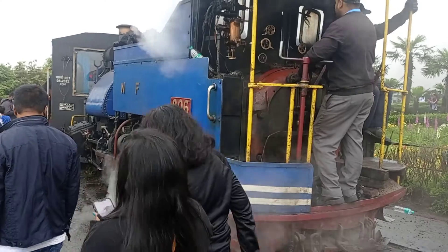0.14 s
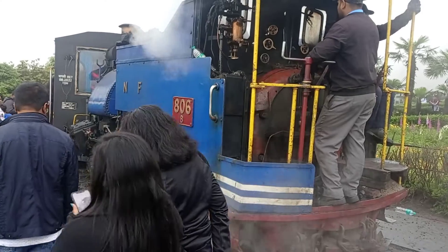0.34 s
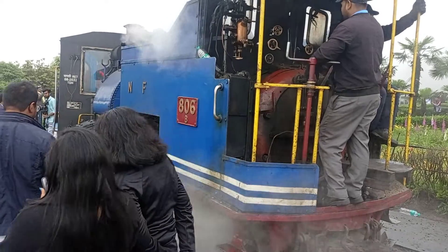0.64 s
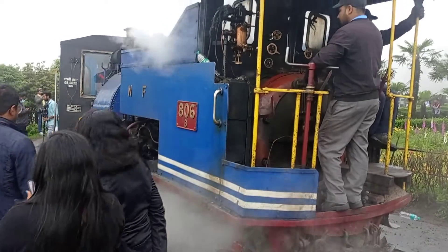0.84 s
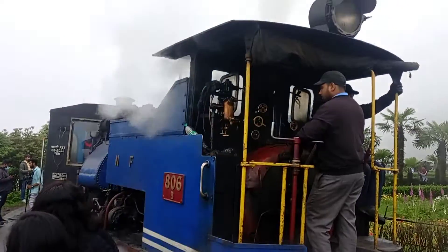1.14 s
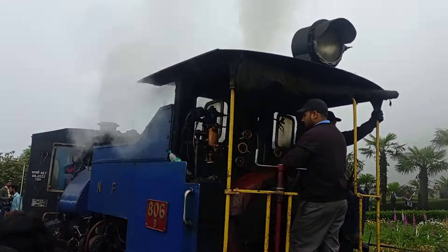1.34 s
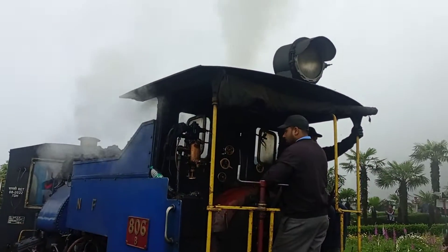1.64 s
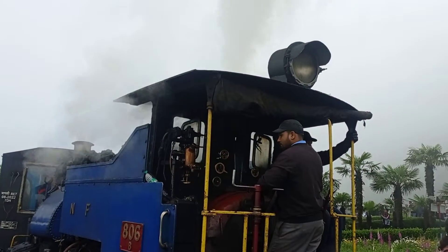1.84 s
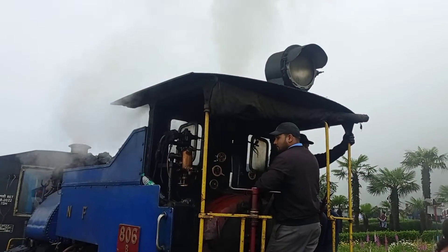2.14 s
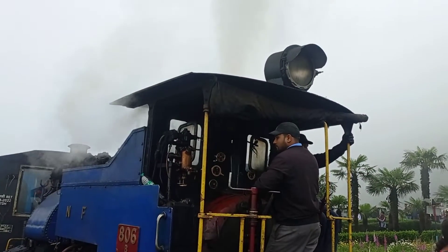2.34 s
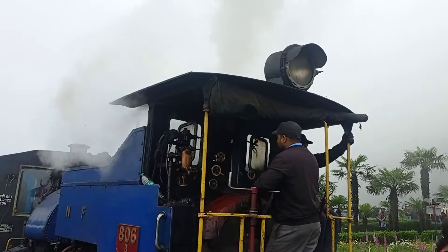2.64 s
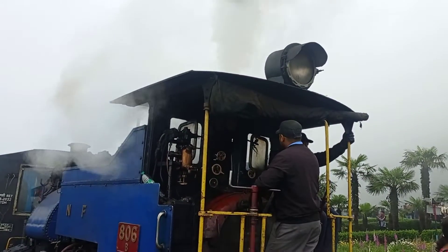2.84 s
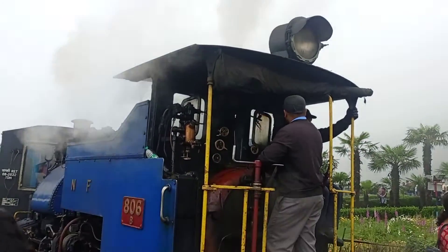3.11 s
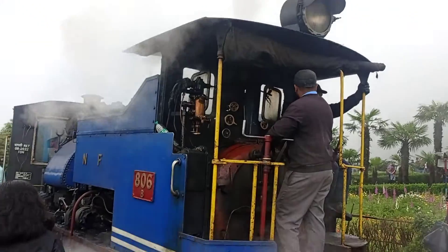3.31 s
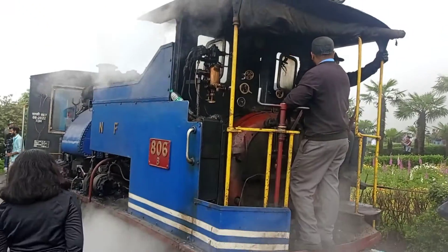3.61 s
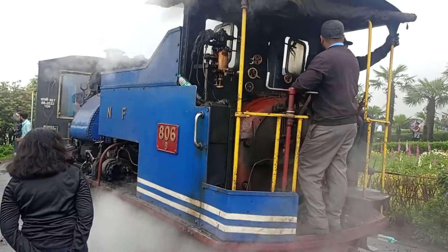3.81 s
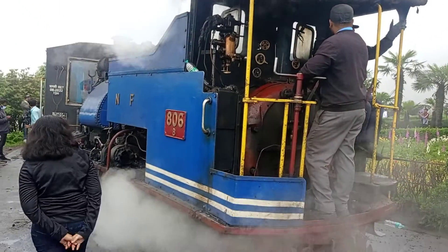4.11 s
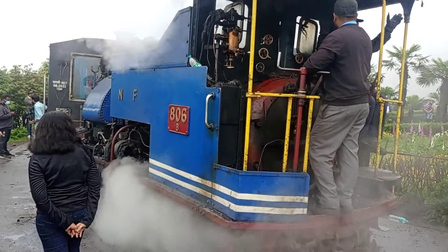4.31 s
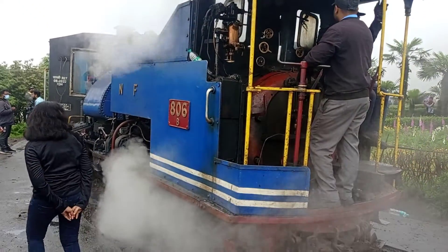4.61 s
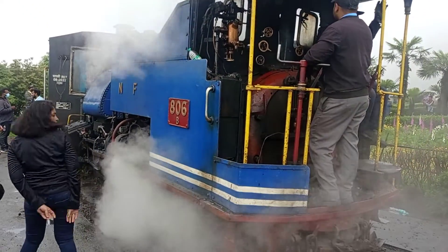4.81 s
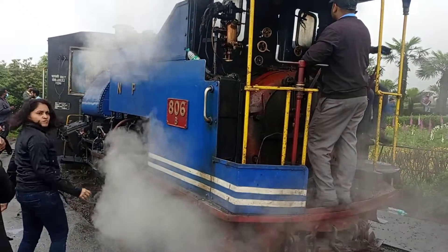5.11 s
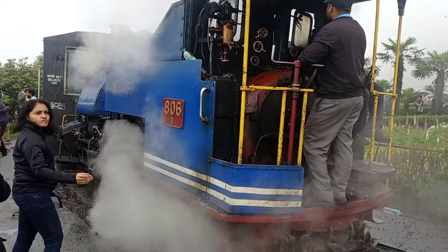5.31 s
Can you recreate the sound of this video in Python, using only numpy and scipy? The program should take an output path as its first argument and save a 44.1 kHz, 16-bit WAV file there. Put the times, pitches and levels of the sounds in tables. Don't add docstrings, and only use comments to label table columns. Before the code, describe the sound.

Outdoors, a few metres from a small steam engine, a handheld microphone catches a brief bump, then one unbroken shrill whistle. It begins hollow and flickering, blooms loud within the first second or so, and stays steady with trembling, shifting overtones. Breathy steam and leaking hiss run underneath, low rumble growing with the loud note and dropping later. It cuts off while still blowing.

```python
import sys
import numpy as np
from scipy import signal
from scipy.fft import rfft, irfft
from scipy.io import wavfile
from scipy.ndimage import uniform_filter1d

SR = 44100
rng = np.random.default_rng(int(sys.argv[2]) if len(sys.argv) > 2 else 0)


def voltage_ratio(level):
    return 10 ** (np.asarray(level, float) / 20)


def unload_wav(signal):
    wavfile.write(
        sys.argv[1],
        SR,
        np.round(np.clip(np.atleast_2d(signal).T, -1, 1) * 32767).astype(np.int16),
    )


N = 240464

DOWN_S, DOWN_TAKES_S = 3.285, 0.51


def whistle(partial_db):
    # (time [s], pitch [Hz])
    pitch_track = [(0.0, 1069.1), (0.62, 1070.5), (0.93, 1071.7), (1.25, 1071.1), (1.71, 1072.7),
                   (1.85, 1072.6), (2.17, 1074.2), (2.4, 1076.1), (2.63, 1074.9), (3.0, 1075.9),
                   (3.3, 1075.7), (3.45, 1076.7), (3.89, 1077.6), (4.35, 1077.6), (4.58, 1075.5),
                   (4.81, 1077.1), (5.28, 1076.8), (5.45, 1077.8)]
    # (multiple of the pitch [1], rms level [dB], loudest at [s], fall [dB/s])
    high_beams = [(8, -67, 4.6, 2.2), (9, -74, 2.0, 4.0), (10, -70, 2.3, 4.0)]
    t = np.arange(N) / SR
    pitch_hz = np.interp(t, *np.transpose(pitch_track))
    tremble_hz = 0.6 * walk(40) + 1.3 * walk(90)
    phase = 2 * np.pi * np.cumsum(pitch_hz + tremble_hz) / SR
    first_db = partial_db[0]
    tone = voltage_ratio(first_db - 0.74) * np.sin(phase)

    open_db = np.clip(first_db + 15.5, 0, 9)
    shut_db = np.clip(-18 - first_db, 0, 14)
    scatter = voltage_ratio(-42 - 1.5 * open_db - 0.3 * shut_db) * voltage_ratio(1.2 * walk(8))
    sharp = phase + 2 * np.pi * 22 * t
    tone = tone + scatter * (walk(90) * np.sin(sharp) + walk(90) * np.cos(sharp))

    overtones = list(zip(range(2, 8), partial_db[1:]))
    for multiple, level_db, loudest_s, fall in high_beams:
        overtones.append((multiple, level_db - fall * abs(t - loudest_s) + walk(3)))
    for multiple, level_db in overtones:
        flutter_db = 0.4 * walk(30) + min(0.4 * multiple, 1.6) * walk(80)
        slide = walk(1.2) + 0.15 * walk(50)
        tone = tone + voltage_ratio(level_db + flutter_db) * np.sin(round(multiple) * phase + slide)
    return np.sqrt(2) * tone


def partial_levels():
    # (rms level [dB], change after the tilt down [dB])
    overtone_levels = [(-35.5, -7), (-33.5, -0.1), (-49.5, 6.5), (-53.5, 2), (-50, -6), (-65.5, 5)]
    # (time [s], half width [s], change [dB])
    sway_1 = [(.03, .015, 8), (.095, .018, 11.5), (.185, .045, 11.5), (.37, .04, -10), (.44, .02, -16),
              (.52, .035, 5.5), (.71, .06, 9), (.84, 0.054, 5), (3.85, .05, -0.1), (4.12, .07, 1),
              (4.25, .04, -0.2), (4.45, .07, 0.9), (4.64, .09, -2.5), (4.9, .1, .5), (5.14, .05, -1)]
    sway_2 = [(.2, 0.39, -1.5), (.72, 0.21, 4), (1.09, 0.085, -11), (1.9, 0.16, 2), (2.3, .05, -3),
              (2.44, 0.034, 3.5), (3.3, 0.1, -2.5), (3.8, .15, -5), (4.05, .08, 1), (4.38, 0.082, -11),
              (4.68, .11, 7), (4.92, .06, -5), (5.18, .025, -6)]
    sway_3 = [(.15, 0.28, -4), (.9, 0.015, 4), (1.06, 0.04, -14), (1.13, 0.025, 5), (1.28, .08, -8),
              (1.85, .12, 3), (2.08, 0.032, -5), (2.26, 0.13, 6.5), (2.41, 0.033, -6), (2.8, 0.42, -9),
              (3.17, 0.081, -11.5), (3.355, 0.03, -16), (3.5, .04, 4), (3.6, 0.024, -7), (3.9, 0.045, -4.5),
              (4.35, 0.14, 3.5), (4.68, 0.059, 4), (4.83, 0.017, -6), (5.3, .04, -3.5)]
    sway_4 = [(.55, 0.1, 7.5), (.87, 0.17, 13.5), (1.12, .08, 6), (1.58, .08, 3.5), (2.42, 0.14, 9.5),
              (3.12, 0.12, 7), (3.4, 0.21, 9.5), (3.7, 0.13, -7.5), (4.45, 0.098, 3.5), (4.66, 0.056, -6),
              (5.0, 0.32, 4), (5.35, 0.035, -5)]
    sway_5 = [(.7, .45, 4), (2.4, .12, 4), (2.9, .2, 1.5), (3.24, .05, 6), (3.41, .09, 12),
              (3.67, .06, 3.5), (4.95, .25, 0.5), (5.35, .08, -8)]
    sway_6 = [(.3, .4, -5), (1.1, .15, -10), (2.2, .1, -3), (2.65, .08, 6), (2.8, .04, -4),
              (3.06, .12, 4.5), (4.15, .12, 5), (4.6, .2, -6), (5.35, .25, 8.5)]
    sway_7 = [(2.14, .06, 7), (2.45, 0.23, 9.5), (3.24, 0.074, 6), (3.5, 0.086, -9), (4.0, .15, 7),
              (4.55, .1, 5), (5.2, .3, 6)]
    up_s, swell_s = 0.86, 0.11
    dead_db, full_db, down_db = -40.5, -11.5, -3
    down = ramp(DOWN_S, DOWN_TAKES_S)
    hidden = np.exp(-np.clip(np.arange(N) / SR - up_s, 0, None) / swell_s)
    levels = [full_db + (dead_db - full_db) * hidden + down_db * down + swells(sway_1)]
    sways = (sway_2, sway_3, sway_4, sway_5, sway_6, sway_7)
    for (level_db, change_db), sway in zip(overtone_levels, sways):
        levels.append(level_db + change_db * down + swells(sway))
    return levels


def steam(breath_db, leak_db, jet_db):
    # (frequency [Hz], level per hertz [dB])
    breath_colour = [(100, -35.5), (200, -17.5), (450, -9), (800, -4.5), (1400, -2), (1800, 1), (2400, -2),
                     (3100, 2.5), (3750, -3), (4150, -4), (5000, -8.5), (7000, -14.5), (9000, -25.5),
                     (14500, -36)]
    leak_colour = [(200, -35), (340, -3.5), (450, -10.5), (600, -5.5), (800, 0), (1400, 3), (1750, -8),
                   (2300, 1), (3000, -6), (5500, 1.5), (7000, -7), (8500, -15), (11000, -26.5),
                   (14500, -31.5)]
    jet_colour = [(7000, -16.5), (9000, -6.5), (11000, -8), (13000, -17), (13950, -13.5), (14600, 0.5),
                  (15300, -1.5), (16500, -8.5)]
    # (centre [Hz], width [Hz], gain [dB])
    hollows = [(820, 28, 4.5), (1370, 100, 2.5), (1700, 300, -5), (2500, 78, -7), (2750, 130, 0),
               (3060, 80, -1), (3277, 46, 3.5), (3930, 160, -0.5), (4090, 360, 4), (6540, 170, 3),
               (8100, 320, -2.5)]
    breath = voltage_ratio(breath_db + 7.5) * hiss(breath_colour, 0.37, 0.48, 9)
    leak = voltage_ratio(1.495 * leak_db + 30) * hiss(leak_colour, 0, 0.5, 20)
    jet = voltage_ratio(1.218 * jet_db + 13.5) * hiss(jet_colour, 0, 0.96, 40)
    hz = np.fft.rfftfreq(N, 1 / SR)
    hollow_db = 0
    for centre_hz, width_hz, gain_db in hollows:
        hollow_db = hollow_db + gain_db * np.exp(-(2 * (hz - centre_hz) / width_hz) ** 2 / 2)
    return irfft(rfft(breath + leak) * voltage_ratio(hollow_db), N) + jet


def steam_levels():
    # (time [s], half width [s], change [dB])
    breath_puffs = [
        (.25, 0.17, -1),
        (2.0, .3, 0),
        (3.2, 0.36, -1.5),
        (4.3, 0.18, -0.2),
    ]
    leak_puffs = [
        (.68, .25, 0.92),
        (1.24, .12, -1.5),
        (3.6, .25, -1.5),
        (5.1, .3, 1.7),
    ]
    jet_puffs = [
        (.85, .2, 1.8),
        (2.5, .1, 1.2),
        (2.97, 0.14, 1.8),
        (3.96, .12, 1.8),
        (5.25, .25, 4),
    ]
    down = (DOWN_S, DOWN_TAKES_S)
    breath_db = turned(-46.5, 6.5, -0.5, (0.5, 0.72), down) + swells(breath_puffs)
    leak_db = turned(-45, -5, -0.5, (0.79, 0.48), down) + swells(leak_puffs)
    return breath_db, leak_db, -56 + swells(jet_puffs)


def rumble():
    # (frequency [Hz], level per hertz [dB])
    rumble_colour = [(25, -17.5), (55, -18), (100, -5.5), (200, 1), (400, -4), (700, -9)]
    low_db = turned(-73, 19.5, -9.5, (0.61, 0.91), (3.35, 0.5))
    return voltage_ratio(low_db + 2) * hiss(rumble_colour, 2.6, 1.2, 75)


def opening_thud():
    # (frequency [Hz], peak level [dB])
    thud_partials = [(85, -33), (390, -33), (620, -38.5), (900, -36), (1400, -33)]
    t = np.arange(N) / SR
    body = 0
    for hz, level_db in thud_partials:
        body = body + voltage_ratio(level_db + 1.5 * walk(157)) * np.sin(2 * np.pi * (hz * t + rng.random()))
    envelope = np.minimum(t / 0.002, (0.018 - t) / 0.003)
    return body * np.clip(envelope, 0, 1)


def hiss(colour, swell_db, flicker_db, rate):
    hz, db = np.transpose(colour)
    octave = np.log2(np.fft.rfftfreq(N, 1 / SR) + 1)
    colour_db = np.interp(octave, np.log2(hz), db, left=-90, right=-90)
    spectrum = rfft(rng.standard_normal(N)) * voltage_ratio(colour_db)
    common_db = swell_db * walk(rate / 4)
    out = 0
    for centre in np.arange(9, 30) / 2:
        band = irfft(spectrum * np.clip(1 - 2 * abs(octave - centre), 0, 1), N)
        out = out + band * voltage_ratio(common_db + flicker_db * walk(rate))
    return out / np.sqrt(np.mean(out ** 2))


def walk(rate):
    hold = int(SR / rate)
    held = np.repeat(rng.standard_normal(1500), hold)[:N]
    return np.sqrt(2) * uniform_filter1d(uniform_filter1d(held, hold), hold)


def ramp(start_s, length_s):
    share = np.clip((np.arange(N) / SR - start_s) / length_s, 0, 1)
    return share * share * (3 - 2 * share)


def swells(rows):
    t = np.arange(N) / SR
    return sum(db * np.exp(-((t - s) / width_s) ** 2) for s, width_s, db in rows)


def turned(low_db, up_db, back_db, up, back):
    return low_db + up_db * ramp(*up) + back_db * ramp(*back)


def scene():
    enter = np.clip((np.arange(N) / SR - 0.013) / 0.0054, 0, 1)
    note = enter * whistle(partial_levels())
    sound = note + steam(*steam_levels()) + rumble() + opening_thud()
    return sound[None]


def low_pass(x):
    return signal.sosfilt(signal.butter(12, 17080, fs=SR, output="sos"), x)


def record(dry):
    ceiling, top_hz = 0.46, 15690
    soft = dry / (1 + (dry / ceiling) ** 4) ** (1 / 4)
    low_cut = signal.butter(2, 45, "high", fs=SR, output="sos")
    high_cut = signal.ellip(12, 0.2, 80, top_hz, fs=SR, output="sos")
    mix = signal.sosfilt(high_cut, signal.sosfilt(low_cut, soft))
    return low_pass(mix)


dry = scene()
out = record(dry)
unload_wav(out)
```